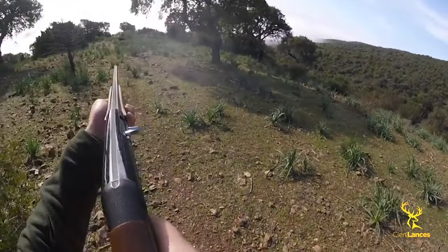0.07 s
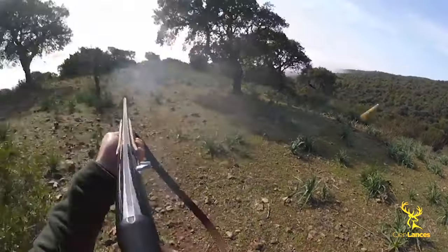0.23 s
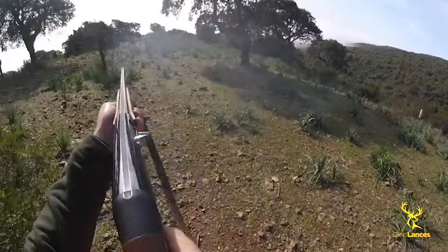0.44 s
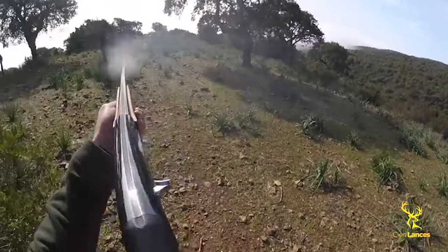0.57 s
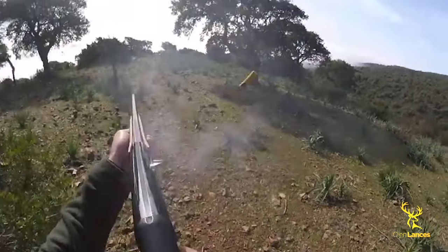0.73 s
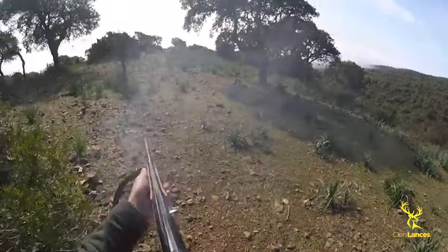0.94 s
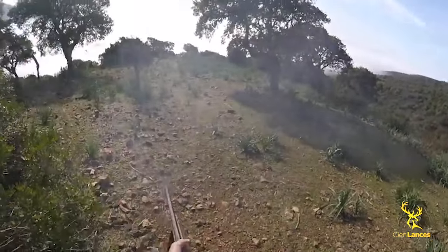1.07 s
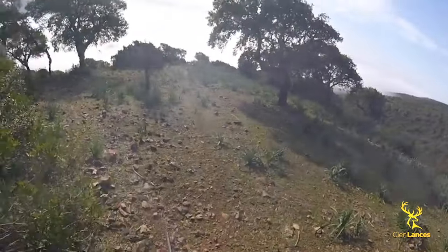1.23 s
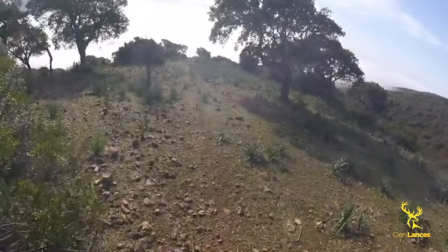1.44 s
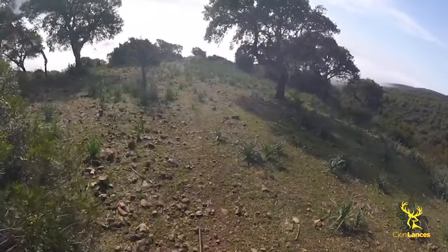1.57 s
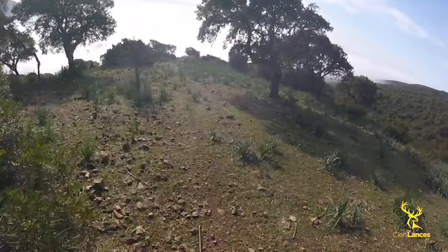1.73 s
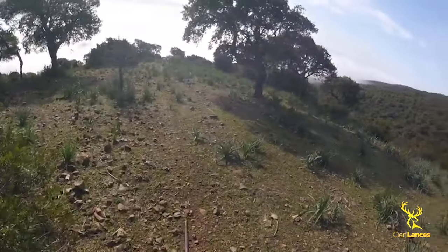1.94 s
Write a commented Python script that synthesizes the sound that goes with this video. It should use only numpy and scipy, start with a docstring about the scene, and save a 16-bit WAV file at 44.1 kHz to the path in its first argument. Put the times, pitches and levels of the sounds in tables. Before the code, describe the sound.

A loud, sharp shotgun blast goes off close by at about 0.2 seconds, followed by small steel clicks as the gun reloads. A second blast comes at 0.7 seconds, with more clicks until 0.9. Each shot echoes off the hillside and trees, dying away by about 1.5 seconds, when a loose metal fitting taps lightly. A faint breeze lies underneath, rising slightly toward the end at 2 seconds.

```python
"""Two shots from a self-loading shotgun on an open, stony hillside, heard from just behind the gun.
Each is a shock wave that rattles the microphone housing, bounces off the ground and scatters back
from rocks and trees. Steel parts click as the gun reloads after each shot, and a loose fitting taps
as it is handled. A light breeze lies underneath."""
import sys
import numpy as np
from scipy import signal
from scipy.fft import rfft, irfft
from scipy.io import wavfile
from scipy.ndimage import uniform_filter1d

SR = 44100
rng = np.random.default_rng(int(sys.argv[2]) if len(sys.argv) > 2 else 0)


def digitize_waveform(pressure):
    """Quantize a signal to 16-bit integers and store it at the path in sys.argv[1].

    Rows of a 2-D input are taken as channels; values are limited to [-1, 1].
    """
    field = np.atleast_2d(pressure).T
    bounded = np.clip(field, -1, 1)
    quanta = np.round(bounded * 32767).astype(np.int16)
    wavfile.write(sys.argv[1], SR, quanta)


N = 88200
T = np.arange(N) / SR
GROUND_DELAY_S = 0.00705   # the ground bounce comes this long after the shot
CLICK_RISE_S = 0.00036


def from_db(db):
    """Turn decibels into a gain."""
    return 10 ** (np.asarray(db) / 20)

def rms_one(x):
    """Scale a sound to an average (rms) level of 1."""
    return x / np.sqrt(np.mean(x ** 2) + 1e-20)

def cut(x, hz, kind, order=2):
    """Keep the "low" or the "high" side of a frequency."""
    return signal.sosfilt(signal.butter(order, hz, kind, fs=SR, output="sos"), x + 1e-18)

def coloured(spectrum, source=None):
    """Give noise, or another source, a tone colour that fades beyond the table's ends."""
    hz, db = np.transpose(spectrum)
    f = np.maximum(np.fft.rfftfreq(N, 1 / SR), 1)
    gain = from_db(np.interp(np.log(f), np.log(hz), db))
    gain *= np.minimum(f / hz[0], 1) ** 2 * np.minimum(hz[-1] / f, 1) ** 2
    return rms_one(irfft(rfft(rng.standard_normal(N) if source is None else source) * gain, N))

def envelope(start, rise, hold, t60):
    """Rise in a straight line; from start + hold, fade by 60 dB every t60 seconds."""
    return np.clip((T - start) / rise, 0, 1) * from_db(-60 * np.maximum(T - start - hold, 0) / t60)

def swell(centre, width):
    """A bell-shaped rise and fall."""
    return np.exp(-.5 * ((T - centre) / width) ** 2)

def ring(start, hz, t60):
    """The fading tone of something struck."""
    age = np.maximum(T - start, 0)
    return np.sin(2 * np.pi * hz * age) * from_db(-60 * age / t60)

def resonate(x, hz, t60):
    """Let a sound ring at one pitch."""
    r = np.exp(-np.log(1000) / (t60 * SR))
    feedback = [1, -2 * r * np.cos(2 * np.pi * hz / SR), r * r]
    return signal.lfilter(np.array([1, 0, -1]) * (1 - r * r) / 2, feedback, x + 1e-18)


# Loudness of the wind in the scrub and on the microphone. Each row: time in seconds, level in dB.
RUSH_LEVEL = [(0, -67.5), (1.05, -63), (1.35, -62), (1.6, -59.5), (1.8, -58.5), (2.0, -55.5)]
BUFFET_LEVEL = [(0, -62.5), (0.33, -56.5), (0.55, -71.5), (1.35, -60), (1.65, -65), (2.0, -60)]
# Tone colours of the wind, and of a faint background hiss with a thin microphone-housing ring.
# Each row: frequency in Hz, relative level in dB.
RUSH_COLOUR = [(100, -7), (210, -1), (400, -7), (750, -2.5), (1300, -5), (2800, -18.5), (4000, -32)]
BUFFET_COLOUR = [(30, 3), (70, -7), (140, -11.5), (300, -33.5)]
HISS_COLOUR = [(1500, 8), (3200, 2), (4200, -5), (6200, -4.5), (6550, -1.5), (6900, -7), (9500, -16.5),
               (11500, -22.5), (14000, -32)]

def breeze():
    """Wind rushes softly in the scrub and buffets the microphone, over a faint background hiss."""
    rush_db = np.interp(T, *np.transpose(RUSH_LEVEL))
    rush = from_db(rush_db) * coloured(RUSH_COLOUR)
    buffet = from_db(np.interp(T, *np.transpose(BUFFET_LEVEL))) * coloured(BUFFET_COLOUR)
    hiss = from_db(-65.5 + 0.1 * (rush_db - rush_db.mean())) * coloured(HISS_COLOUR)
    return rush + buffet + hiss


def reflections(spectrum, per_second=1700, share=0.39):
    """Many separate small reflections over a smooth wash."""
    grains = rms_one((rng.random(N) < per_second / SR) * rng.standard_normal(N))
    return coloured(spectrum, np.sqrt(share) * grains + np.sqrt(1 - share) * rng.standard_normal(N))

# Tone colours of the returning sound. Each row: frequency in Hz, relative level in dB.
STONES_COLOUR = [(300, -15), (1500, -2.5), (2600, -0.5), (3900, -7.5), (5600, 0.5), (7000, -3.5),
                 (9900, -16.5), (11000, -28.5), (13000, -51)]
SLOPE_COLOUR = [(59, -44), (100, -12.5), (333, -6.5), (565, -11.5), (979, -7), (1730, -9.5), (1880, -6),
                (4240, -9.5), (5640, -1), (6120, -8.5), (9580, -16), (11500, -40.5), (13000, -56)]
ECHO_COLOUR = [(60, -19.5), (280, 2), (600, -4.5), (1500, 2), (2800, -3), (5000, -11.5), (9000, -18.5),
               (13000, -63)]
ROLL_COLOUR = [(150, 6), (270, 2.5), (420, -15.5)]
# Echoes from trees and banks. Each row: delay in seconds, level in dB, width in seconds.
ECHOES = [(0.0625, -36, 0.0046), (0.098, -46, 0.0081), (0.15, -46.5, 0.0051), (0.2385, -41, 0.0026),
          (0.274, -45, 0.0084), (0.347, -49.5, 0.021)]

def hillside(start):
    """A shot returns from near stones, the slope and trees, and as a low roll from across the valley."""
    scatter = reflections(SLOPE_COLOUR)
    stones = from_db(-30.5) * envelope(start, GROUND_DELAY_S, 0, t60=0.11) * coloured(STONES_COLOUR)
    low = cut(scatter, 3520, "low", order=1)
    treble = scatter - low
    slope = low * envelope(start, 0.051, 0, t60=1.65) + treble * envelope(start, 0.051, 0, t60=0.9)
    slope *= from_db(-38.5) * envelope(start, GROUND_DELAY_S, 0.36, t60=0.64)   # dies past the crest
    echoes = sum(from_db(db) * swell(start + delay, width) for delay, db, width in ECHOES)
    echoes *= reflections(ECHO_COLOUR)
    roll = from_db(-61) * swell(start + 0.3, width=0.07) * coloured(ROLL_COLOUR)
    return stones + cut(slope + echoes, 110, "high") + roll


# Taps of a loose fitting. Each row: start in seconds, level in dB.
TAPS = [(0.028, -53.5), (1.1234, -56), (1.4731, -37), (1.4756, -41), (1.893, -56.5)]
# Its ringing tones. Each row: pitch in Hz, relative level in dB, ring time in seconds.
FITTING_TONES = [(1330, -0.5, 0.063), (2280, -2, 0.0033), (3400, -10, 0.029), (4920, 2, 0.01),
                 (5250, 1.5, 0.0077), (5690, -2.5, 0.0091)]

def loose_fitting(tap_s=0.0012):
    """Light chattering taps ring a small metal part as the gun is handled."""
    taps = sum(from_db(db) * envelope(start, CLICK_RISE_S, tap_s, 2 * tap_s) for start, db in TAPS)
    chatter = rng.standard_normal(N) * taps
    rings = sum(from_db(db) * rms_one(resonate(chatter, hz, t60)) for hz, db, t60 in FITTING_TONES)
    return cut(rms_one(rings) * chatter.std(), 6900, "low", order=4)


# Bolt, carrier and shell making contact.
# Each row: start in seconds, level in dB, length in seconds, brightest pitch in Hz.
CLICKS = [(0.2385, -30.5, 0.004, 6400), (0.332, -33.5, 0.006, 6900), (0.384, -42.5, 0.0047, 5400),
          (0.3944, -38, 0.0009, 7000), (0.4021, -22, 0.0011, 3950), (0.4135, -38, 0.0072, 5660),
          (0.71, -33, 0.0023, 7200), (0.798, -37, 0.0056, 8200), (0.832, -48.5, 0.0073, 3000),
          (0.851, -43, 0.0023, 5750), (0.8662, -30, 0.0013, 5300), (0.869, -38, 0.0025, 5200),
          (0.8922, -45, 0.0053, 5450)]
# Ringing tones of the steel. Each row: pitch in Hz, relative level in dB, ring time in seconds.
STEEL_TONES = [(1352, -7.5, 0.02), (2140, 2.5, 0.009), (2659, 7, 0.0081), (3850, -11, 0.024),
               (4364, 2.5, 0.0063), (5050, 2.5, 0.007), (5750, -1, 0.0058), (6500, -3, 0.0039),
               (7650, -11.5, 0.00508), (8900, -3.5, 0.0037)]

def reloading(focus_octaves=0.14):
    """Each contact is a gritty scrape that rings the steel, most strongly near its own pitch."""
    clicks, grit = np.zeros(N), coloured(CRACK_COLOUR)   # same colour as the shot's crack, below
    for start, db, length, bright_hz in CLICKS:
        contact = envelope(start, CLICK_RISE_S, length / 2, 4 * length)
        scrape = rng.standard_normal(N) * contact
        rings = np.zeros(N)
        for hz, tone_db, t60 in STEEL_TONES:
            nearness = np.exp(-.5 * (np.log2(hz / bright_hz) / focus_octaves) ** 2)
            rings += from_db(tone_db) * (0.27 + nearness) * rms_one(resonate(scrape, hz, t60))
        rasp = cut(grit * contact, bright_hz / 2, "high", order=1)
        rasp = rms_one(cut(rasp, 1.7 * bright_hz, "low", order=4))
        rasp *= 0.96 * min(length / 0.0056, 1)   # shorter contacts have less grit
        click = rms_one(cut(rings, 9600, "low", order=10)) + rasp
        clicks += from_db(db) * rms_one(click) * np.sqrt(length * SR / N)
    return clicks


def pressure(start, length):
    """Air pressure jumps, falls to zero after `length` seconds, then dips into a fading suction."""
    age = np.maximum(T - start, 0) / length
    return (T >= start) * np.cos(np.pi / 2 * age) * np.exp(-age / 1.4)

def shock(start, length):
    """A short pressure jump, limited to the microphone's range."""
    return cut(cut(pressure(start, length), 40, "high", order=1), 11100, "low", order=6)

# Tone colours of the crack and of the boom from the muzzle gas and nearest ground.
# Each row: frequency in Hz, relative level in dB.
CRACK_COLOUR = [(200, -14), (700, -1), (1400, -4.5), (2500, -3.5), (3800, 0.5), (5300, 0.5), (6600, -1.5),
                (8000, -6), (9900, -4.5), (10800, -17), (13000, -21.5), (15500, -58.5)]
BOOM_COLOUR = [(25, 1), (45, 7), (90, -17), (170, -7.5), (700, -8.5), (2000, -35)]
# Tones of the microphone housing. Each row: pitch in Hz, relative level in dB, ring time in seconds.
HOUSING_TONES = [(313.5, -29.5, 0.016), (445, -29, 0.013), (738, -31, 0.043), (1303, -33.5, 0.15),
                 (2320, -31, 0.022), (5230, -28.5, 0.061), (5600, -38, 0.027), (6460, -15, 0.037)]
# The shots. Each row: start in seconds; levels of shock, crack, housing ring and thump in dB; thump
# pitch in Hz and delay in seconds; gas push level in dB, then its delay and length in seconds.
SHOTS = [(0.2163, -7, -13.5, -5, -6, 346, 0.001, -19.5, 0.0022, 0.0053),
         (0.6886, -2, -15, -2.5, -10.5, 584, 0.001956, -28.5, 0.0099, 0.015)]

def shot(start, shock_db, crack_db, ring_db, thump_db, thump_hz, thump_delay,
         push_db, push_delay, push_length):
    """A shock and crack jolt the housing, the gas pushes out, and a duller copy bounces off the ground."""
    front = from_db(shock_db) * shock(start, length=0.00016)
    harsh = coloured(CRACK_COLOUR)
    for _ in range(2):   # clipping the noise makes it harsh
        harsh = coloured(CRACK_COLOUR, np.sign(harsh))
    crack = from_db(crack_db) * harsh * envelope(start, rise=0.0006, hold=0.0011, t60=0.014)
    housing = sum(from_db(ring_db + db) * ring(start, hz, t60) for hz, db, t60 in HOUSING_TONES)
    thump = -from_db(thump_db) * ring(start + thump_delay, thump_hz, t60=0.0071)
    push = from_db(push_db) * cut(pressure(start + push_delay, push_length), 501.4, "low")
    boom = from_db(-25) * envelope(start, rise=0.00058, hold=0, t60=0.093) * coloured(BOOM_COLOUR)
    bounce = from_db(-10) * shock(start + GROUND_DELAY_S, length=0.00051)
    bounce += from_db(-12.5) * np.interp(T - GROUND_DELAY_S, T, crack)
    return front + crack + housing + thump + push + boom + cut(bounce, 7600, "low")


def scene(dip_db=-28):
    """Mix gun, hillside and breeze; the background dips briefly before each shot."""
    gun, background, dip = reloading() + loose_fitting(), breeze(), np.zeros(N)
    for start, *settings in SHOTS:
        gun += shot(start, *settings)
        background += hillside(start)
        dip += (T > start - 0.055) & (T < start - 0.005)
    background *= from_db(dip_db * uniform_filter1d(dip, size=300))
    return (gun + background)[None]

def record(dry, ceiling=0.8, top_hz=16000):
    """Round off the loudest peaks and cut the highest treble."""
    rounded = ceiling * np.tanh(dry / ceiling)
    return signal.sosfilt(signal.cheby2(12, 70, top_hz, fs=SR, output="sos"), rounded)


dry = scene()
out = record(dry)
digitize_waveform(out)
```